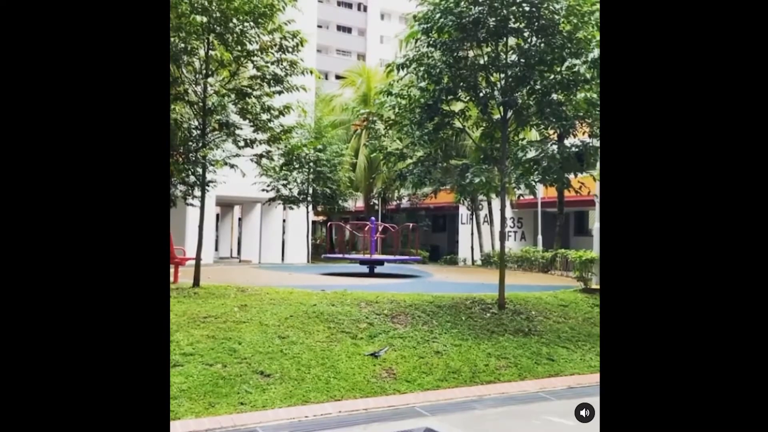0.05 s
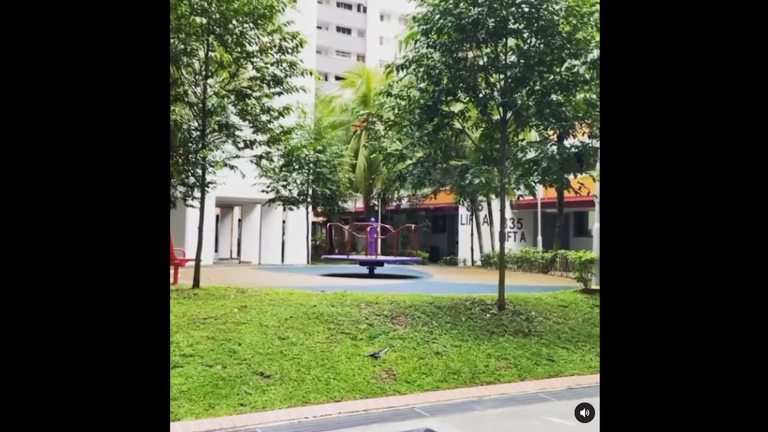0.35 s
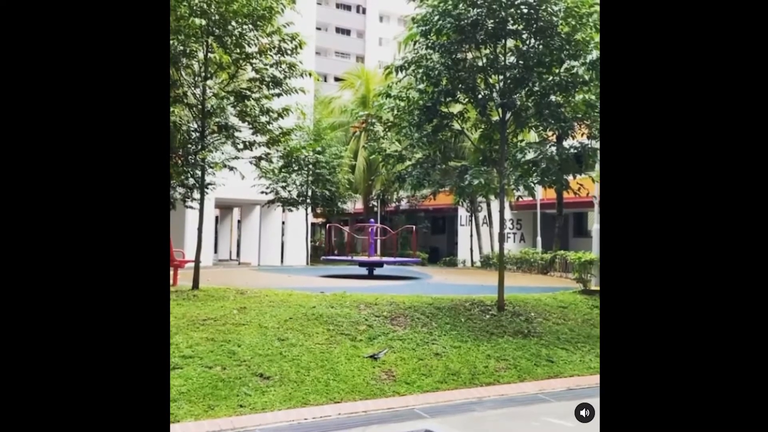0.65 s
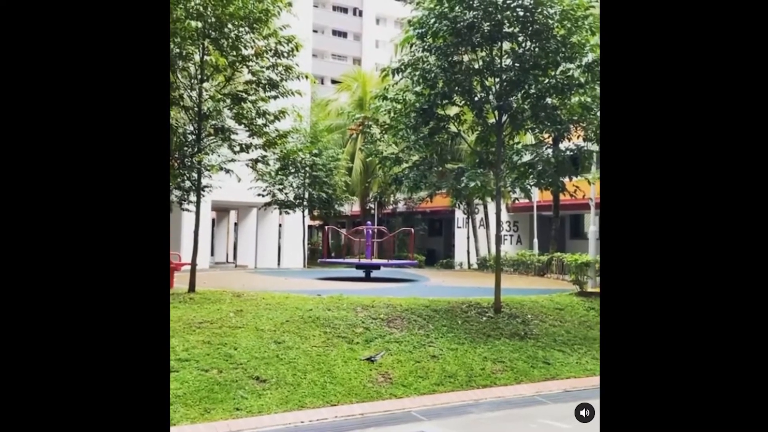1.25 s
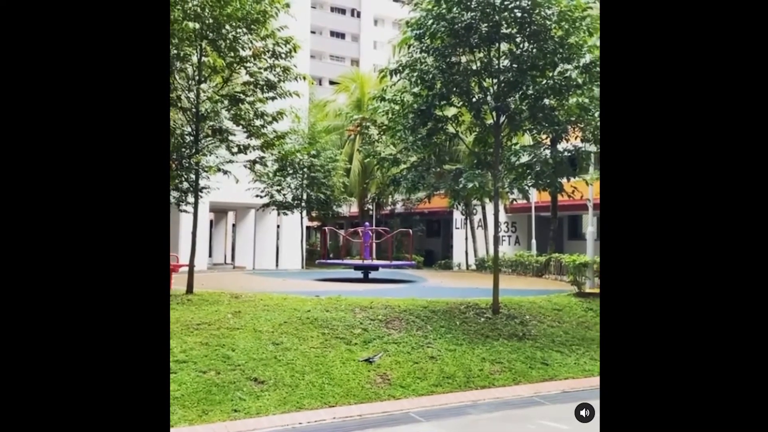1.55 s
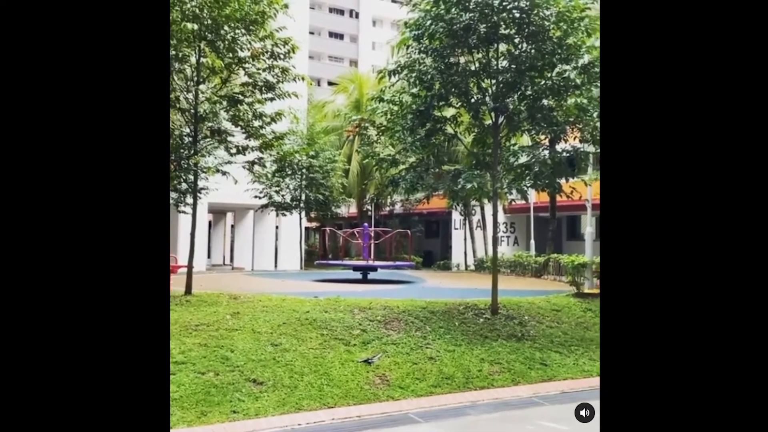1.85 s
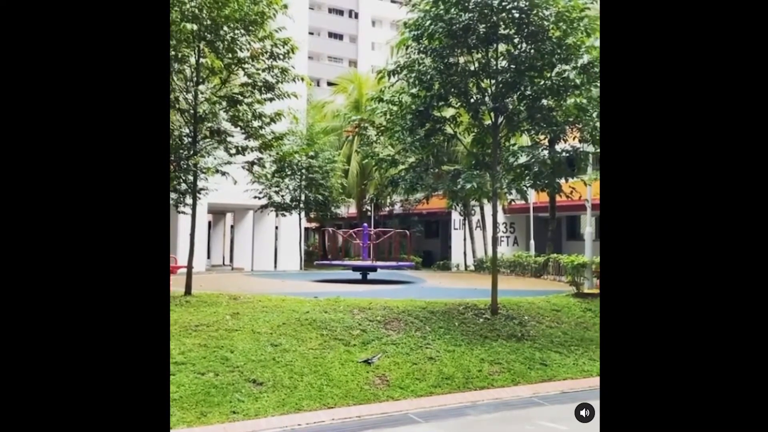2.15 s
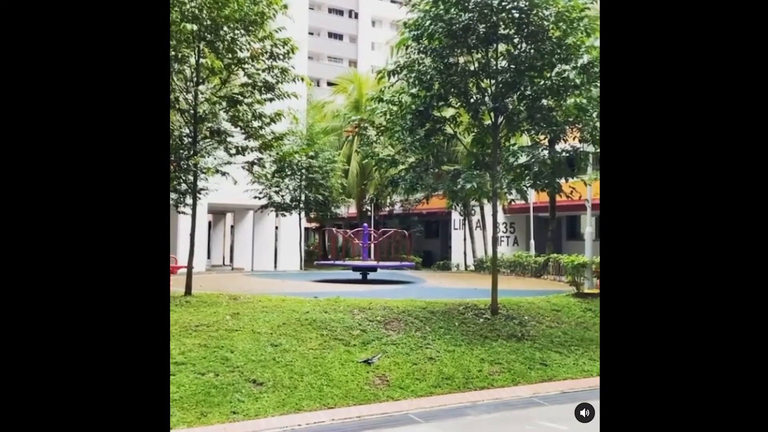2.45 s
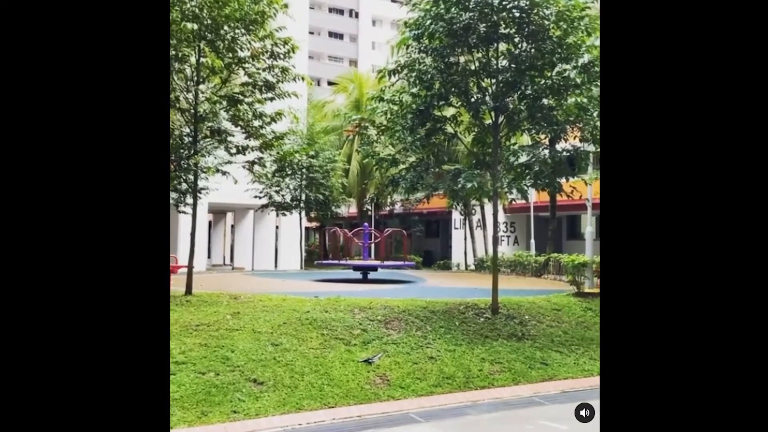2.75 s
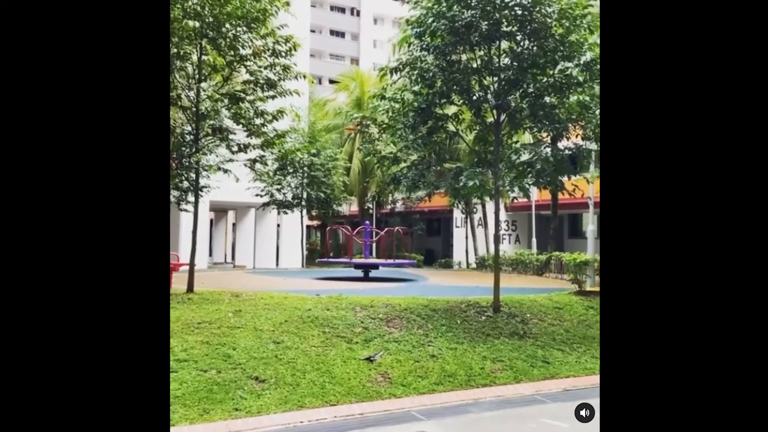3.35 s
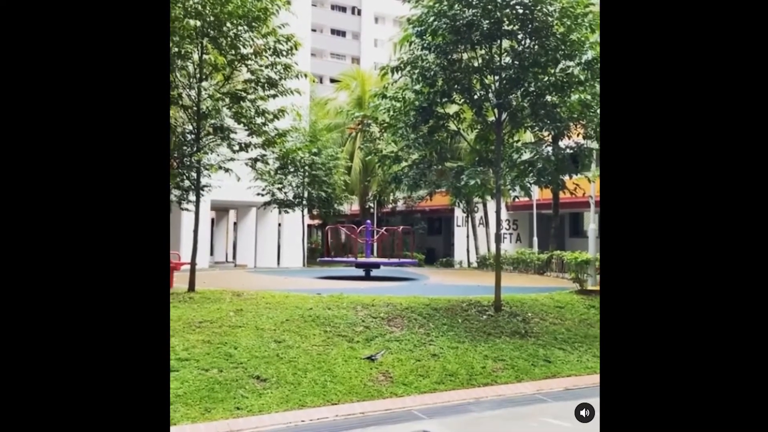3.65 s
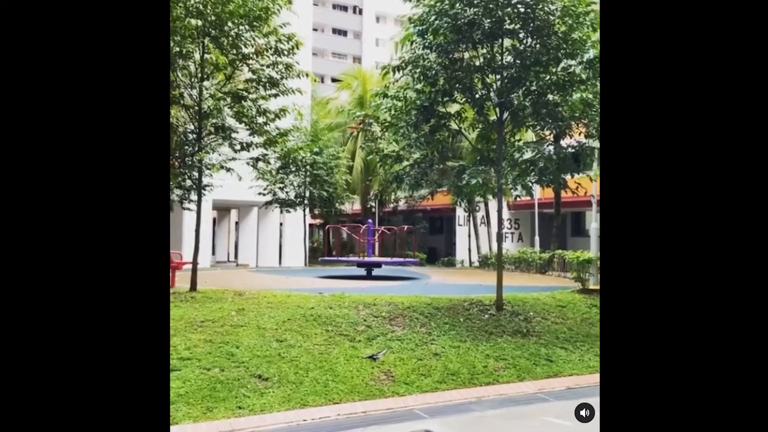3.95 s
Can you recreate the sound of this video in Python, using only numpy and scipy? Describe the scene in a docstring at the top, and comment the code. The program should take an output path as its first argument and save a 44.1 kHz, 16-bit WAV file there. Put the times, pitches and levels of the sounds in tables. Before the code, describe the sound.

Squeaky bird calls, each with a raspy start, ring off the walls of an outdoor courtyard, quickly at first and then sparser. The bird is nearer the microphone than the steady traffic rumble, which swells midway with soft thumps.

```python
"""Squeaky bird in a courtyard

A bird gives seven short calls between apartment blocks, whose walls echo each one. Every call
scoops up from a low rasp to a shrill held note, a whistle under rough overtones, and drops at
its end. Distant traffic rumbles throughout, with a few dull thumps and a short hiss midway."""
import sys
import numpy as np
from scipy import signal
from scipy.fft import rfft, irfft, next_fast_len
from scipy.io import wavfile
from scipy.ndimage import map_coordinates

SR = 44100
rng = np.random.default_rng(int(sys.argv[2]) if len(sys.argv) > 2 else 0)


def waveform_to_disk(signal):
    """Save audio, clipped to [-1, 1], as 16-bit WAV at the path in sys.argv[1]."""
    frames = np.transpose(np.atleast_2d(signal))
    scaled = np.clip(frames, -1, 1) * 32767
    samples = np.round(scaled).astype(np.int16)
    wavfile.write(sys.argv[1], SR, samples)


N = 176400

# Tone colours of the road's rumble, roar, hiss and thump noise: freq_hz, level_db
RUMBLE_EQ = [(24, -59), (30, 3), (34, 3), (46, 0.5), (70, -0.5), (110, -0.5), (160, -11.5), (250, -10),
             (400, -15.5), (800, -16.5), (1500, -26), (3000, -28.5), (6000, -44.5), (9000, -50.5),
             (10500, -39.5), (11600, -63), (12400, -66), (15000, -78)]
ROAR_EQ = [(60, -31), (130, 8), (350, -1), (600, -4.5), (1200, -7.5), (2500, -19), (6000, -70)]
HISS_EQ = [(900, -22), (2000, 15.5), (4500, 1.5), (6500, 3), (8500, -16), (12000, -13.5), (15000, -51)]
THUMP_EQ = [(50, -20), (110, 8), (180, 0), (300, -10), (800, -17.5), (1600, -22), (5000, -120)]
# Stereo image of the road: freq_hz, correlation
ROAD_IMAGE = [(30, 1), (130, 0.94), (300, 0.79), (700, 0.13), (1500, -0.61), (3000, -0.67), (8000, 1)]
# One brief swell of road noise: time_s, roar_db, hiss_db
ROAD_SWELL = [(1.499, -45, -53), (1.844, -47, -55.5), (1.875, -44.5, -44.5), (1.96, -39.5, -44),
              (2.119, -45.5, -50), (2.33, -43.5, -45.5), (2.5, -42, -50.5), (2.75, -53, -59), (3, -79, -90)]
# Dull thumps from the road: start_s, level_db, length_s
ROAD_THUMPS = [(1.59, -37, 0.081), (1.863, -27.5, 0.051), (1.981, -35.5, 0.14), (2.128, -37.5, 0.18),
               (2.251, -33.5, 0.11), (2.51, -39, 0.16), (3.419, -36.5, 0.079), (3.926, -38.5, 0.083)]

# Slaps off the walls: delay_s, level_db, left_over_right_db
WALL_ECHOES = [(.036, -5.5, -0.5), (.075, -8, 0.5), (.108, -9.5, 0.5), (.138, -8.5, 2), (.178, -14, 4),
               (.2, -15.5, -2)]
# Decay of the courtyard's tail: freq_hz, t60_s
TAIL_DECAY = [(200, 13.5), (2200, 1.47), (4400, 1.48), (6500, 1.41), (9000, 1.07), (14000, 0.4)]
# Balance of that tail: freq_hz, left_over_right_db
TAIL_PAN = [(2200, -4.5), (4000, 0), (12000, -0.5)]
# Stereo image of the slaps and the tail: freq_hz, correlation
YARD_IMAGE = [(2200, -0.055), (4400, -0.12), (6500, 0.99), (12000, 0.63)]

# Resonances of the bird's throat and beak: freq_hz, gain_db
THROAT_EQ = [(600, -50), (1450, -27), (1850, 0.5), (2060, 0.5), (2160, 5), (2250, -5.5), (2330, -2),
             (2500, -13.5), (3000, -11), (3450, -10.5), (4000, -9.5), (4450, -11), (4750, -75),
             (5500, -24.5), (6100, -12), (6700, -13), (7050, -69), (7700, -23.5), (8400, -23.5),
             (8800, -34), (9200, -37), (9800, -23), (10600, -28), (11200, -42.5), (12000, -25),
             (12800, -34.5), (13500, -35), (15500, -50)]
# The calls (the first comes before the start, so only its tail is heard): start_s, rasp_s, note_s,
# pitch_hz, level_db, second_harmonic_db, third_harmonic_db, top_harmonics_db, hoarse_db,
# direct_db, left_over_right_db
BIRD_CALLS = [ (-.42, 0.0089, 0.054, 2020, -28, -4, -4, -4, -6.5, 6, 0),
              (.242, .010, .084, 2180, -28.5, -4, -6, -2, -18, -2, -6.5),
              (.587, 0.0084, 0.071, 2217, -27, -4.5, -2, -3, -15.5, -0.5, -2.5),
              (.926, .009, 0.077, 2241, -26, -2, -0.5, -5.5, -25, -6.5, -3.5),
              (1.272, .012, .11, 2208, -33, 4.5, 4.5, -1.5, -21, -4.5, -3),
              (2.012, 0.013, .078, 2231, -26.5, 0, -1.5, 0.5, -21.5, 0.5, 5),
              (2.979, .02, 0.057, 2120, -37, 8, 8.5, 1, -13.5, 2, 3.5),
              (3.538, 0.013, 0.079, 2218, -34, 2.5, 0, -1.5, -20, 2.5, 4.5)]

TOP_HZ = 15500


def amp(db):
    """Decibels to gain."""
    return 10 ** (np.asarray(db) / 20)


def along(points, hz):
    """Read a curve of (frequency, value) points on a log frequency axis."""
    freqs, values = np.transpose(points)
    return np.interp(np.log(hz + 1), np.log(freqs + 1), values)


def wobble(rate, size=N):
    """A smooth random curve with `rate` knots a second."""
    return map_coordinates(rng.standard_normal(4096), [np.arange(size) * rate / SR + 2], mode="wrap")


def pan(db):
    """Stereo gains with the left side db above the right."""
    return amp(np.array([[db], [-db]]) / 2)


def noise(eq, image, size=N):
    """Stereo noise of rms 1, coloured by eq, with the left-right correlation given by image."""
    hz = np.fft.rfftfreq(size, 1 / SR)
    width = np.arccos(np.clip(along(image, hz), -1, 1)) / 2
    coloured = rfft(rng.standard_normal((2, size))) * amp(along(eq, hz))
    mid, side = irfft(coloured * [np.cos(width), np.sin(width)], size)
    stereo = np.array([mid + side, mid - side])
    return stereo / np.sqrt(np.mean(stereo ** 2) + 1e-20)


def add(out, sound, start_s):
    """Mix a sound in at start_s, trimming what falls outside."""
    i = round(start_s * SR)
    sound = sound[:, max(-i, 0):max(out.shape[1] - i, 0)]
    out[:, max(i, 0):max(i, 0) + sound.shape[1]] += sound


def traffic():
    """A steady bed of far rumble, with a roar and a hiss that swell midway."""
    times, roar_db, hiss_db = np.transpose(ROAD_SWELL)
    t = np.arange(N) / SR
    bed = amp(-40.5 + 0.49 * wobble(4.52)) * noise(RUMBLE_EQ, ROAD_IMAGE)
    roar = amp(np.interp(t, times, roar_db) + 2.4 * wobble(22.08)) * noise(ROAR_EQ, ROAD_IMAGE)
    hiss = amp(np.interp(t, times, hiss_db) + 0.46 * wobble(23.44)) * noise(HISS_EQ, ROAD_IMAGE)
    return bed + roar + hiss


def thumps(pitch_hz=112.1, wander=0.12, rush_db=-6.5):
    """Soft low booms, each a swell of one unsteady resonance in a broad dull rush."""
    out, size = np.zeros((2, N)), SR // 2
    t = np.arange(size) / SR
    for start_s, level_db, length_s in ROAD_THUMPS:
        phase = 2 * np.pi * np.cumsum(pitch_hz * (1 + wander * wobble(61, size))) / SR
        boom = np.sin(phase) + amp(rush_db) * noise(THUMP_EQ, ROAD_IMAGE, size)
        age = 2 * t / length_s
        swell = 2 * age * np.exp(-age ** 2 / 2)
        add(out, pan(-0.2) * amp(level_db) * swell * boom, start_s)
    return out


def from_the_right(road, lag_s=0.00025, corner_hz=1200):
    """The road lies to the right, so its lows reach the left side later."""
    left, right = road
    hz = np.fft.rfftfreq(N, 1 / SR)
    delay_s = lag_s / (1 + (hz / corner_hz) ** 4)
    return np.array([irfft(rfft(left) * np.exp(-2j * np.pi * hz * delay_s), N), right])


def scatter(call, response):
    """Smear a call through a stereo response, keeping its energy."""
    wet = signal.fftconvolve(call[None], response, axes=1)
    return wet * np.sqrt(2 * np.sum(call ** 2) / np.sum(wet ** 2))


def courtyard(call, tail_db=2, build_s=0.018, blur_s=0.0036):
    """Wall slaps, blurred by facades and foliage, and a diffuse tail that loses its treble first."""
    flat_eq = [(1000, 0)]
    hz, t, wash = signal.stft(noise(flat_eq, YARD_IMAGE, 2 * SR), SR, nperseg=256)
    fade = amp(-60 * t / along(TAIL_DECAY, hz)[:, None]) * (1 - np.exp(-t / build_s))
    sides = amp(np.outer([.5, -.5], along(TAIL_PAN, hz)))[:, :, None]
    _, tail = signal.istft(wash * fade * sides, SR, nperseg=256)
    wet = amp(tail_db) * scatter(call, tail)
    blur = np.exp(-np.arange(SR // 20) / SR / blur_s)
    for delay_s, level_db, side_db in WALL_ECHOES:
        slap = scatter(call, blur * noise(flat_eq, YARD_IMAGE, len(blur)))
        add(wet, amp(level_db) * pan(side_db) * slap, delay_s)
    return wet


def squeak(rasp_s, note_s, pitch_hz, second_db, third_db, top_db, hoarse_db):
    """One call: whistle, breath and rough overtones; at first the period triples, making the rasp."""
    attack_s, clear_s, break_s, release_s = 0.0065, 0.006, 0.011, 0.0072
    size = SR // 4
    t = np.arange(size) / SR
    end_s = rasp_s + note_s
    note_age, to_end = np.maximum(t - rasp_s, 0), np.minimum(t - end_s, 0)
    rasp = .5 - .5 * np.tanh((t - rasp_s) / clear_s)  # falls to 0 as the voice clears
    breakup = np.exp(to_end / break_s)  # rises to 1 as the note ends

    scoop = 1 - .175 / (1 + np.exp((t - rasp_s) / .0058))
    climb = 1 + 0.369 * (to_end + note_s / 2)
    drop = 1 - 0.199 * np.exp(to_end / 0.00708)
    arch_hz = pitch_hz * scoop * climb * drop

    # The steady whistle swells in after the overtones and fades in the breakup.
    whistle_db = along(THROAT_EQ, arch_hz) - 9 * np.exp(-note_age / 0.019) - 22 * breakup
    whistle_hz = arch_hz * (1 + .004 * wobble(151, size))
    whistle = amp(whistle_db) * np.sin(2 * np.pi * np.cumsum(whistle_hz) / SR)

    jitter = .011 + .045 * rasp + .05 * breakup
    rough_hz = arch_hz * (1 + jitter * wobble(501.2, size))
    phase = 2 * np.pi * np.cumsum(rough_hz) / SR
    overtone_eq = [(2300, 0.0047), (3600, second_db), (4600, second_db),
                   (5900, third_db), (6900, third_db), (8000, top_db)]
    bite_db = 6 * np.exp(-note_age / 0.011)  # overtones get an early lift
    dull_db = 9.5 * rasp + 10 * breakup  # loss per harmonic above the second
    breath = amp(second_db - 21.5) * noise(THROAT_EQ, [(1000, 0.78)], size)[0]
    voice = np.sqrt(2) * whistle + breath
    for harmonic in np.arange(4, 22) / 3:
        hz = harmonic * rough_hz
        db = along(THROAT_EQ, hz) + along(overtone_eq, hz) + bite_db - dull_db * max(harmonic - 2, 0)
        if harmonic % 1:  # partials between the harmonics carry the rasp and hoarseness
            gain = (amp(-3.5) * rasp + amp(hoarse_db)) * amp(5 * wobble(303, size))
        else:  # higher harmonics shimmer more
            gain = amp(1.1 * harmonic * wobble(199.3, size))
        partial = np.sin(harmonic * phase + rng.uniform(0, 2 * np.pi)) * (hz < TOP_HZ)
        voice += np.sqrt(2) * gain * amp(db) * partial

    body = amp(-15.5 * rasp - 3 * (1 - rasp))  # a quiet rasp opens into the loud note
    gate = np.clip(t / attack_s, 0, 1) * np.clip((end_s - t) / release_s, 0, 1)
    return voice * body * gate


def bird():
    """The calls: the direct sound varies as the bird turns, and the courtyard always answers."""
    out = np.zeros((2, N))
    for start_s, rasp_s, note_s, pitch_hz, level_db, *timbre, direct_db, side_db in BIRD_CALLS:
        call = amp(level_db) * squeak(rasp_s, note_s, pitch_hz, *timbre)
        add(out, amp(direct_db) * pan(side_db) * call, start_s)
        add(out, courtyard(call), start_s)
    return out


def scene():
    """The bird up front, the road far behind it."""
    return bird() + from_the_right(traffic() + thumps())


def record(dry):
    """A brick-wall high cut on the mix at TOP_HZ."""
    size = next_fast_len(N + SR // 2)
    passband = np.fft.rfftfreq(size, 1 / SR) < TOP_HZ
    return irfft(rfft(dry, size) * passband, size)[:, :N]


dry = scene()
out = record(dry)
waveform_to_disk(out)
```